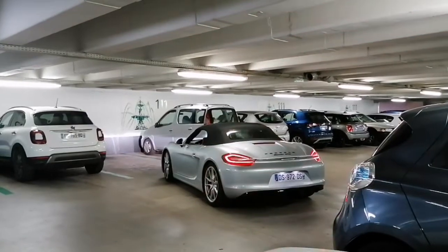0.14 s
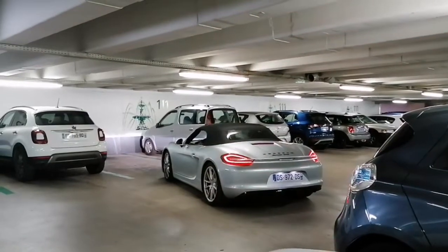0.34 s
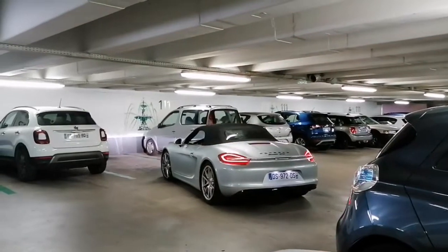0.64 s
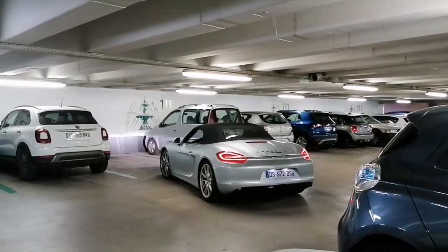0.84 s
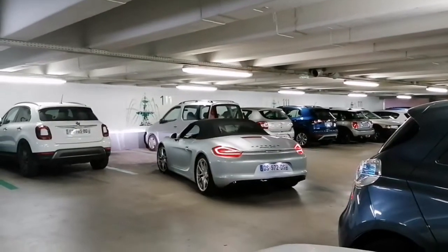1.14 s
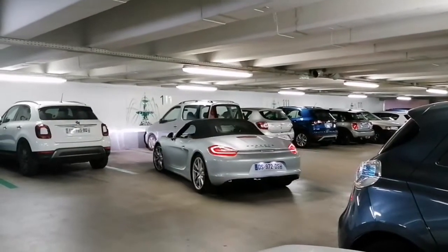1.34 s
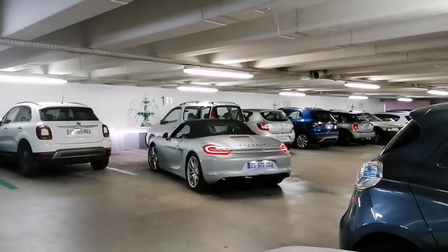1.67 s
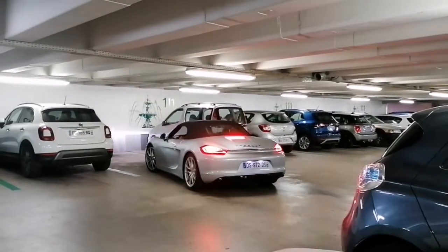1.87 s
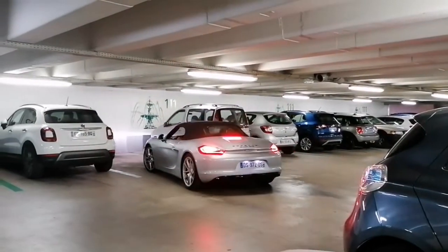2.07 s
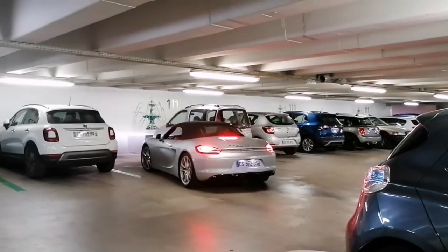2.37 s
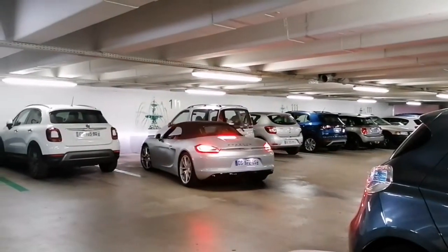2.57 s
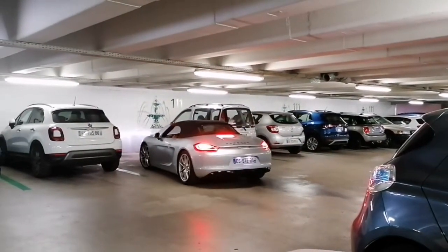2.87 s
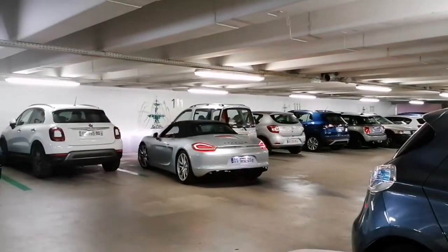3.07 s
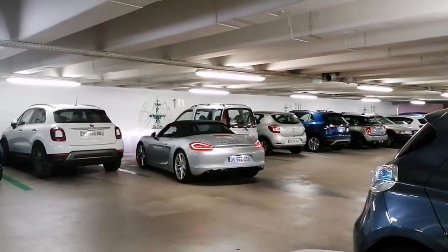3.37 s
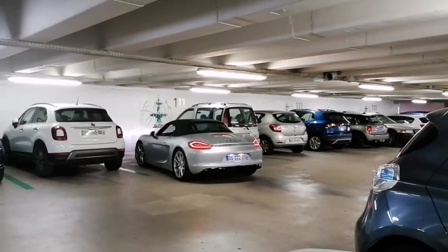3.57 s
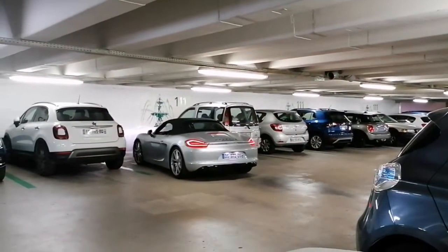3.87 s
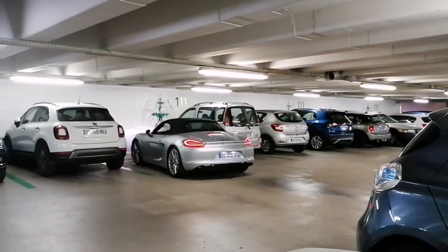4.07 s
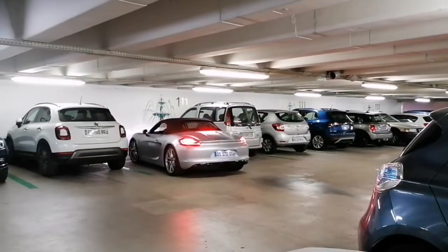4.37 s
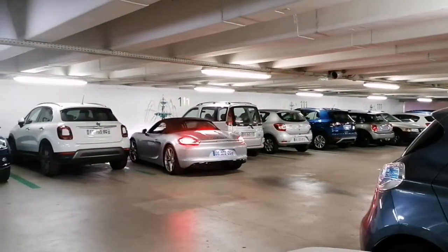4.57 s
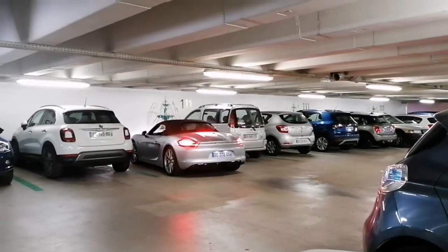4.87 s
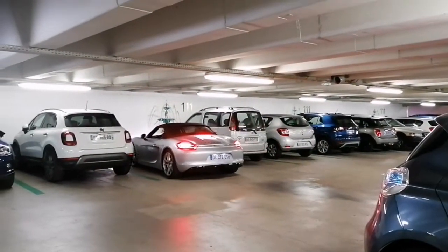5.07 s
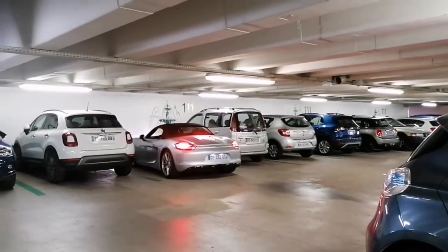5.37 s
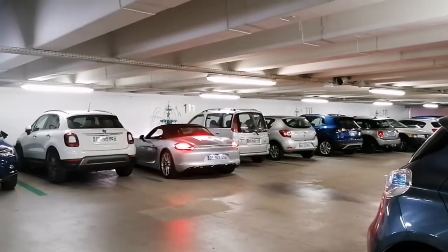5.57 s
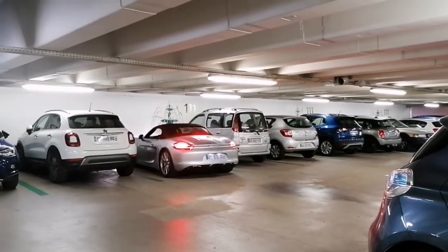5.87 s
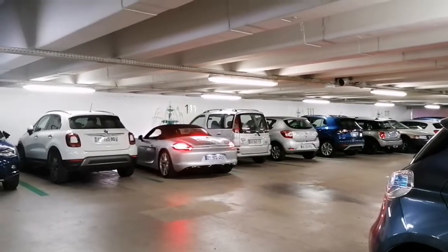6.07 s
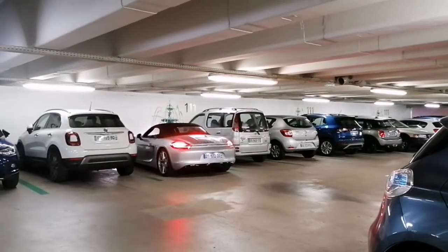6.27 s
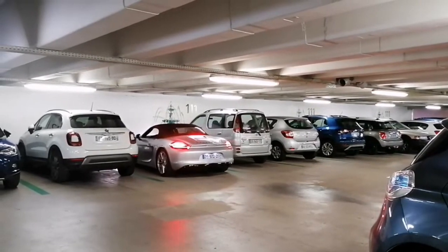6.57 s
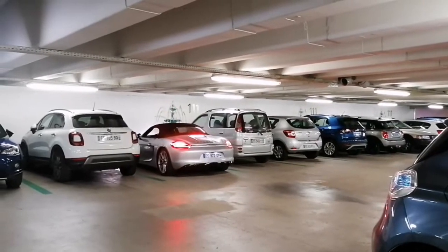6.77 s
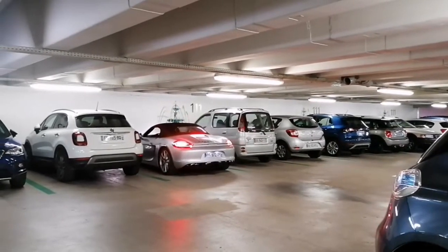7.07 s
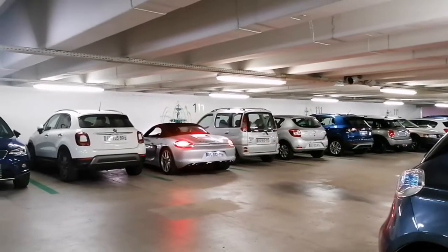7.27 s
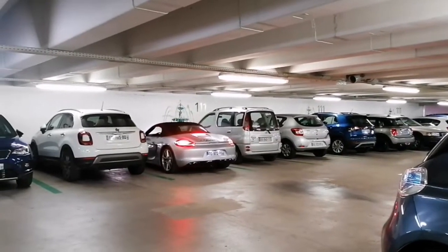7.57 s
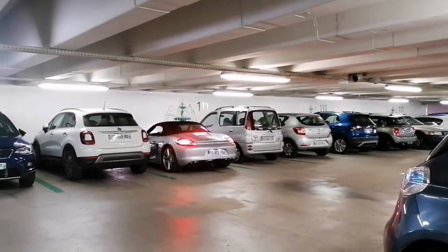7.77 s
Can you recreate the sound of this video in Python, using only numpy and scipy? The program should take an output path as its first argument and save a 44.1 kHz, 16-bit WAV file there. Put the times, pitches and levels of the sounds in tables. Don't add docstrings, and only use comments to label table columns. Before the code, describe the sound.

Underground garage, one microphone some metres behind a car. First a short booming rev with rough exhaust, intake hiss and small squeals, falling quickly to a low fluttering idle. The burble and steady casing hiss continue over faint ventilation rumble. Low tones come and go, quietest early in the idle; a quick cluster of barks leaves the tailpipe midway, and the later idle booms more strongly with a raspy edge, all echoing.

```python
import sys
import numpy as np
from scipy import signal
from scipy.fft import rfft, irfft, next_fast_len
from scipy.io import wavfile
from scipy.ndimage import uniform_filter1d

SR = 44100
rng = np.random.default_rng(int(sys.argv[2]) if len(sys.argv) > 2 else 0)


def transcribe(signal):
    frames = np.atleast_2d(signal).T
    limited = np.clip(frames, -1, 1)
    pcm = np.round(limited * 32767).astype(np.int16)
    wavfile.write(sys.argv[1], SR, pcm)


def nominal_scale(level):
    x = np.asarray(level, float) / 20
    return 10 ** x


N = 348831


def rms_one(x):
    return x / np.sqrt(np.mean(x ** 2) + 1e-20)


def evened(x, size):
    return x / np.sqrt(uniform_filter1d(x ** 2, size) + 1e-12)


def in_time(rows):
    s, *columns = np.transpose(rows)
    return [np.interp(np.arange(N) / SR, s, c) for c in columns]


def drift(rate):
    r = np.exp(-80 * np.pi * rate / SR)
    sparse = rng.standard_normal(N // 40 + 2002)
    slow = signal.lfilter([1], [1, -2 * r, r * r], sparse)[2000:]
    return np.interp(np.arange(N) / 40, np.arange(len(slow)), rms_one(slow))


def swell(s, half, db):
    first = max(int((s - 3 * half) * SR), 0)
    last = min(int((s + 3 * half) * SR), N)
    near = np.arange(first, last)
    out = np.zeros(N)
    out[near] = nominal_scale(db) * np.exp(-np.abs((near / SR - s) / half) ** 2.6)
    return out


def held_open(db, open_s, shut_s, rise_db, fall_db):
    now = np.arange(N) / SR
    before = np.maximum(open_s - now, 0)
    after = np.maximum(now - shut_s, 0)
    return nominal_scale(db - rise_db * before - fall_db * after)


def resonate(x, peaks):
    out = 0
    for k, (hz, width, db) in enumerate(peaks):
        r = np.exp(-np.pi * width / SR)
        b = (1 - r * r) / 2 * np.array([1, 0, -1])
        a = [1, -2 * r * np.cos(2 * np.pi * hz / SR), r * r]
        out = out + (-1) ** k * nominal_scale(db) * signal.lfilter(b, a, x)
    return out


def coloured(spectrum):
    size = next_fast_len(N)
    hz, db = np.transpose(spectrum)
    log_hz = np.log(np.maximum(np.arange(size // 2 + 1) * SR / size, 1))
    gain = nominal_scale(np.interp(log_hz, np.log(hz), db))
    return rms_one(irfft(rfft(rng.standard_normal(size)) * gain, size)[:N])


def hall_answer(size):
    t60_s, wall_cut_hz = 1.42, 5700
    w = 2 * np.pi * np.arange(size // 2 + 1) / size
    loss = np.log(1000) * (1 + w * SR / (2 * np.pi * wall_cut_hz)) / (t60_s * SR)
    answer = 0
    for k, lag in enumerate((rng.uniform(.025, .07, 12) * SR).astype(int)):
        loop = np.exp(-(loss + 1j * w) * lag)
        level = np.sqrt(1 - np.exp(-2 * loss * lag))
        answer = answer + (-1) ** k * loop / (1 - loop) * level
    return answer / np.sqrt(12)


def in_hall(x, wet_db, answer):
    size = 2 * (len(answer) - 1)
    run_in = np.concatenate([x[SR:0:-1], x])
    tail = irfft(rfft(run_in, size) * answer, size)[SR:SR + N]
    return rms_one(x + nominal_scale(wet_db) * tail)


def puffs(turns, jitter, uneven_db, breath):
    at = np.flatnonzero(np.diff(np.floor(turns)) > 0)
    chance = rng.standard_normal((len(at), 2))
    late = (jitter * SR * chance[:, 0]).astype(int)
    clicks = np.zeros(N)
    clicks[np.clip(at + late, 0, N - 1)] = nominal_scale(uneven_db * chance[:, 1])
    gust = signal.lfilter([1], [1, -np.exp(-1 / (0.024 * SR))], clicks)
    return clicks + breath * gust * rng.standard_normal(N)


def order(multiple, speed):
    turns = multiple * np.cumsum(speed) / SR
    shake = 0.056 * multiple * drift(3.17)
    strength = np.sqrt(2) * nominal_scale(0.29 * multiple * np.tanh(drift(17)))
    return strength * np.sin(2 * np.pi * (turns + 0.22 + 0.26 * rng.random()) + shake)


def boom(per_s, effort_db):
    # (multiple of firing rate, level [dB])
    quiet_db = [(1, -45), (2, -41.5), (3, -49), (4, -50), (5, -49), (8, -53.5)]
    # (multiple of firing rate, level [dB])
    order_db = [(1.5, -53), (6, -52.5), (7, -59), (9, -61), (10, -61.5), (11, -64), (12, -59.5), (13, -64),
                (14, -60), (15, -63), (17, -65)]
    # (time [s], half length [s], level [dB])
    throbs = [(0.076, 0.1, -27.5), (0.516, 0.084, -25), (.3, .1, -41), (.7, .06, -35), (.86, .08, -38),
              (.2, 0.076, -35), (1.0, .15, -43), (1.28, .08, -40), (1.62, .12, -44), (4.003, .3, -39),
              (4.5, .22, -39), (5.07, .1, -36.5), (5.68, 0.36, -39.5), (6.751, .35, -35), (7.05, 0.13, -34),
              (7.45, 0.075, -37), (7.729, 0.11, -35)]
    # (time [s], half length [s], level [dB])
    booms = [(0.066, 0.081, -22), (0.202, 0.1, -24.5), (0.469, 0.057, -24), (0.582, 0.05, -30.5),
             (0.668, .025, -43), (0.752, 0.04, -34), (.33, .04, -36.5), (1.028, 0.13, -38.5),
             (2.403, 0.25, -35.5), (2.727, 0.12, -37), (2.956, 0.11, -35), (3.247, 0.095, -36.5),
             (3.497, .12, -37.5), (3.955, 0.17, -29), (4.16, 0.072, -31), (4.395, 0.22, -35),
             (4.722, 0.085, -33.5), (5.1, 0.12, -35), (5.418, 0.13, -29.5), (5.67, 0.25, -26),
             (6.12, 0.24, -26.5), (6.44, 0.21, -27), (7.005, 0.14, -26.5), (7.187, 0.12, -22),
             (7.42, 0.1, -26.5), (7.752, 0.13, -25), (7.93, 0.028, -21)]
    # (time [s], multiple of firing rate, half length [s], level [dB])
    drones = [(0.19, 3, 0.31, -35.5), (.58, 3, 0.067, -37), (0.986, 3, 0.043, -33), (2.916, 3, 0.39, -43),
              (5.9, 3, .15, -49), (6.06, 3, 0.32, -39.5), (7.47, 3, 0.58, -44), (0.53, 4, 0.071, -39),
              (.88, 4, 0.35, -41), (1.36, 4, 0.65, -40), (2.45, 4, .3, -46), (3.62, 4, 0.15, -42.5),
              (4.196, 4, 0.63, -45.5), (5.6, 4, .3, -53), (6.702, 4, 0.17, -41), (7.396, 4, .2, -51),
              (3.9, 8, 0.11, -42), (.96, 5, .08, -42), (1.56, 5, 0.45, -38.5), (3.2, 5, 0.38, -40),
              (3.6, 5, 0.063, -35.5), (4.4, 5, 0.21, -44.5), (5.54, 5, 0.31, -47.5), (0.535, 8, 0.1, -40.5),
              (1.2, 8, 0.047, -38), (2.358, 8, 0.2, -44.5), (5.15, 8, 0.3, -44), (5.854, 8, 0.21, -36),
              (7.304, 8, 0.66, -48.5), (7.6, 8, .05, -40.5), (7.21, 8, 0.08, -38), (7.42, 8, 0.044, -37),
              (7.76, 8, .05, -40), (6.303, 8, 0.15, -45), (1.6, 3, .12, -45), (2.4, 3, .25, -46.5),
              (6.1, 4, .25, -45.5), (5.6, 5, .15, -46), (4.8, 8, 0.088, -49), (1.55, 8, 0.11, -52),
              (6.55, 8, .1, -48), (1.95, 8, 0.11, -49)]
    # (time [s], multiple, half length [s], level [dB])
    singing = [(0.068, 7, 0.071, -39.5), (0.224, 6, 0.16, -46), (.2, 14, 0.045, -54),
               (0.347, 11, 0.11, -47.5), (1.2, 6, 0.39, -48.5), (1.496, 12, 0.2, -58.5),
               (1.5, 15, 0.23, -53), (2.4, 12, 0.18, -60), (2.94, 10, 0.081, -54), (3.3, 15, 0.08, -58),
               (3.68, 15, 0.24, -56), (3.7, 9, 0.27, -51.5), (4.15, 6, 0.59, -50.5), (4.4, 9, 0.16, -43),
               (4.675, 12, 0.12, -55), (4.92, 12, 0.45, -54), (5.2, 15, 0.36, -60.5), (5.9, 9, 0.14, -60),
               (6.004, 15, 0.65, -55), (6.101, 12, 0.38, -65.5), (6.3, 6, 0.2, -44.5),
               (6.595, 12, 0.087, -59), (6.904, 11, 0.09, -50), (7.046, 15, 0.057, -53.5),
               (7.15, 12, 0.15, -58), (7.52, 6, 0.092, -50), (7.0, 6, 0.057, -51), (7.76, 6, .06, -51),
               (.37, 1.5, .1, -44), (4.05, 7, 0.33, -48.5), (4.7, 7, 0.38, -53), (5.5, 7, 0.38, -47.5),
               (6.4, 7, 0.19, -44.5), (7.1, 7, 0.34, -48), (7.75, 7, 0.17, -55.5), (1.398, 10, 0.48, -58.5),
               (2.747, 9, 0.15, -56.5), (6.45, 9, .15, -57), (5.602, 12, 0.27, -59.5), (5.9, 10, .1, -55),
               (7.5, 9, .2, -56)]
    # (time [s], multiple, half length [s], depth [dB])
    nulls = [(1.19, 1, .03, -13), (1.4, 1, .05, -17), (4.87, 1, .05, -9), (7.32, 1, .04, -12),
             (.9, 2, 0.042, -11), (4.58, 2, 0.027, -12), (6.72, 2, .03, -11), (3.74, 2, 0.037, -1),
             (3.3, 4, 0.12, -10), (3.7, 3, .1, -9), (5.7, 3, .08, -5), (1, 3, .1, -5), (4.9, 5, .1, -4),
             (7.4, 5, .15, -6.5)]
    # (time [s], half length [s], flutter [dB re 1 dB])
    beating = (1.0, .25, 8.7)
    flutter_db, flutter_per_s = 2.6, 14
    hold_s, hold_sag_hz = .34, 2.6
    now = np.arange(N) / SR
    held = np.maximum(per_s, np.interp(now - hold_s, now, per_s) - hold_sag_hz)
    low = [(s, 1, half, db) for s, half, db in throbs]
    low += [(s, 2, half, db) for s, half, db in booms]
    low += list(drones)
    out = 0
    for multiple, db in quiet_db:
        power = nominal_scale(db) ** 2 + sum(swell(s, half, top) ** 2 for s, k, half, top in low if k == multiple)
        dips_db = sum(depth_db * swell(s, half, 0) for s, k, half, depth_db in nulls if k == multiple)
        shaken_db = (flutter_db + swell(*beating)) / multiple * np.tanh(drift(flutter_per_s))
        speed = held if multiple < 2.5 else per_s
        out = out + nominal_scale(dips_db + shaken_db) * np.sqrt(power) * order(multiple, speed)
    for multiple, db in order_db:
        lost_db = 2.0 * (held - per_s)
        gain = nominal_scale(db + 0.48 * effort_db + 2.8 * np.tanh(drift(3.8)) - lost_db)
        gain += sum(swell(s, half, top) for s, k, half, top in singing if k == multiple)
        out += gain * order(multiple, per_s)
    return out


def burble(turns, effort_db, hall):
    # (frequency [Hz], width [Hz], level [dB])
    silencer = [(186.8, 62.6, 2), (229.8, 58.4, 0.5), (277.5, 16, -0.5), (429, 24, -18), (492.6, 40, -17.5),
                (772, 42, -13.5), (912, 108, -19), (297.8, 35.2, -3.5)]
    pipe = resonate(puffs(turns, jitter=.0009, uneven_db=2.5, breath=0.076), silencer)
    pipe = signal.sosfilt(signal.butter(4, 140, "high", fs=SR, output="sos"), pipe)
    level_db = -36 + 0.1 * effort_db
    return nominal_scale(level_db - 3.0) * evened(in_hall(pipe, 1.6, hall), size=5000)


def mechanics(turns, noise_db):
    # (frequency [Hz], density [dB per Hz])
    clatter = [(180, -26.5), (300, -3.5), (362, -10), (501, -9), (657, -8.5), (783, -13.5), (1170, -19),
               (1710, -21), (2190, -18), (4300, -30.5), (4850, -25.5), (6900, -40.5), (7580, -29.5),
               (9850, -68.5), (16700, -120)]
    # (frequency [Hz], width [Hz], level [dB])
    casing_peaks = [(1080, 86, -14.5), (1502, 120, -7), (2206, 150, -8), (3043, 140, -14), (3770, 190, -15),
                    (4840, 520, -16), (7330, 410, -7)]
    pulse = 1 + 0.04 * np.cos(2 * np.pi * turns)
    broad = coloured(clatter)
    casing = resonate(rng.standard_normal(N), casing_peaks)
    return nominal_scale(noise_db + 3.5) * (pulse * broad + nominal_scale(14.5) * casing)


def ventilation():
    return nominal_scale(-52) * coloured([(15, -20), (30, -4), (50, -9), (80, -4), (150, -3), (300, -30)])


def blip(turns, hall):
    # (frequency [Hz], width [Hz], level [dB])
    blip_peaks = [(440, 22, -1), (846, 120, 2), (1188, 13, -6.5), (2030, 38, -7), (3020, 1200, -17.5),
                  (5460, 500, -22.5)]
    # (level [dB], reached [s], held until [s], rise [dB/s], fall [dB/s])
    throttle = (-45.5, -0.6, 0, 102, 27.5)
    # (time [s], frequency [Hz], half length [s], level [dB])
    slips = [
        (0.196, 1570, 0.066, -47.5),
        (0.332, 1615, 0.048, -49),
        (.44, 1634, 0.043, -50),
        (0.542, 1620, .05, -51.5),
    ]
    # (time [s], half length [s], level [dB])
    intake = [
        (.15, 0.04, -47),
        (.26, .02, -49),
        (.42, 0.032, -50),
        (.92, 0.049, -55.5),
    ]
    rough = resonate(puffs(turns, jitter=0.0013, uneven_db=-2.5, breath=.4), blip_peaks)
    slip = rng.standard_normal(N)
    squeal = 0
    for s, hz, half, db in slips:
        belt = resonate(resonate(slip, [(hz, 70, 0)]), [(hz, 70, 0)])
        squeal = squeal + swell(s, half, db) * evened(belt, size=2000)
    hiss = coloured([(900, -34), (1800, 0.5), (3000, 4.0), (4200, -14), (5000, 1), (6200, -16.0), (7700, -24.0)])
    gulps = sum(swell(s, half, db) for s, half, db in intake)
    return held_open(*throttle) * in_hall(rough, 6.3, hall) + squeal + gulps * hiss


def rings():
    # (time [s], frequency [Hz], half length [s], level [dB])
    tones = [(0.17, 1130, 0.07, -53), (.05, 1450, .06, -55), (0.15, 2200, .05, -58), (.6, 810, .08, -50),
             (0.4, 1700, .04, -60), (2.88, 2400, 0.12, -62), (0.21, 450, 0.15, -45),
             (.28, 193, 0.17, -38.5), (0.43, 462, 0.13, -43), (0.5, 430, 0.15, -45.5),
             (0.576, 195, 0.05, -35), (0.713, 190, 0.044, -35.5), (0.65, 400, 0.055, -48),
             (0.63, 430, 0.075, -48.5), (3.274, 2190, 0.076, -62), (3.418, 1540, 0.024, -53.5),
             (2.205, 1440, 0.0074, -54), (0.46, 292, .1, -45.5), (0.67, 278, .06, -39.5),
             (1.1, 260, .07, -43), (0.51, 240, 0.066, -49), (0.43, 300, 0.054, -45.5),
             (2.8, 292, 0.071, -43)]
    now = np.arange(N) / SR
    out = 0
    for s, hz, half, db in tones:
        tone = np.sin(2 * np.pi * hz * now + .5 * drift(14))
        out = out + np.sqrt(2) * swell(s, half, db) * tone
    return out


def rasp(turns, hall):
    # (time [s], half length [s], level [dB])
    flares = [
        (.18, 0.084, -48),
        (0.402, 0.2, -42.5),
        (0.926, 0.054, -43.5),
        (2.8, 0.63, -54),
        (3.99, 0.046, -53),
        (4.7, 0.16, -45.5),
        (5.12, 0.29, -48),
        (6.06, 0.58, -46.5),
        (6.954, 0.22, -46),
        (7.498, 0.36, -48),
    ]
    bark = puffs(turns / 2, jitter=.001, uneven_db=4.5, breath=0.15)
    bark = bark + nominal_scale(-9.5) * puffs(turns, jitter=.001, uneven_db=5.5, breath=0.19)
    bark = resonate(bark, [(816, 190, 0)])
    turned = swell(7.5, 0.64, 0)
    straight = (1 - turned) * resonate(bark, [(763.5, 53, 5.1)])
    swung = turned * resonate(bark, [(787.0, 54, 3.5)])
    bark = straight + swung + resonate(bark, [(895, 59, -5), (1004, 42, -12.5)])
    level = nominal_scale(-59) + sum(swell(*row) for row in flares)
    return nominal_scale(-4.0) * level * evened(in_hall(bark, 8.8, hall), size=8000)


def barks():
    # (time [s], peak level [dB])
    hard_firings = [
        (4.592, -33),
        (4.650, -29),
        (4.708, -33),
        (4.764, -35),
        (5.755, -40),
    ]
    pipe_hz, width_hz = 775, 97
    s, db = np.transpose(hard_firings)
    clicks = np.full(N, 1e-18)
    clicks[(s * SR).astype(int)] = nominal_scale(db) * SR / (2 * np.pi * width_hz)
    return resonate(clicks, [(pipe_hz, width_hz, 0)])


def scene():
    # (time [s], firing rate [1/s])
    speed = [(0, 41), (.36, 42), (.6, 32.3), (.75, 32.2), (.88, 34), (1.08, 33), (1.2, 34), (2.95, 34.5),
             (3.3, 34.2), (3.7, 33.2), (3.85, 32), (4.5, 32.6), (4.65, 34.8), (5.08, 35.1), (5.22, 34),
             (6.2, 34.3), (6.65, 33), (7.2, 35.2)]
    # (time [s], level [dB])
    load = [
        (0, -49),
        (.06, -45.5),
        (.42, -45),
        (.72, -48.5),
        (1.9, -50),
        (2.3, -49),
        (2.65, -50),
        (3.9, -50.5),
        (4.05, -49),
        (4.5, -50.5),
    ]
    (per_s,), (noise_db,) = in_time(speed), in_time(load)
    effort_db = noise_db - np.median(noise_db)
    turns = np.cumsum(per_s) / SR
    hall = hall_answer(2 * next_fast_len(N // 2 + SR))
    exhaust = boom(per_s, effort_db) + burble(turns, effort_db, hall)
    exhaust += blip(turns, hall) + rasp(turns, hall) + barks()
    return (exhaust + mechanics(turns, noise_db) + ventilation() + rings())[None]


def band_limit(x):
    return signal.sosfilt(signal.butter(12, 7730, fs=SR, output="sos"), x)


def record(dry):
    cut = signal.sosfilt(signal.cheby2(10, 60, 8290, fs=SR, output="sos"), dry)
    return band_limit(cut)


dry = scene()
out = record(dry)
transcribe(out)
```